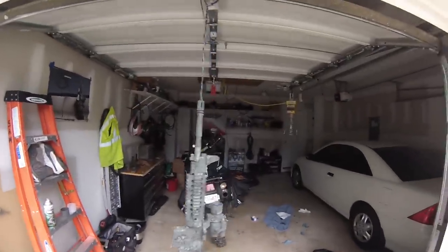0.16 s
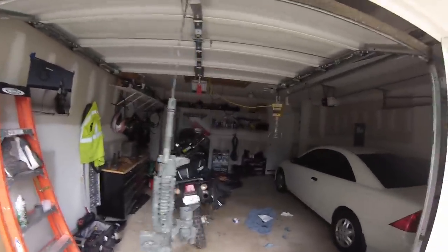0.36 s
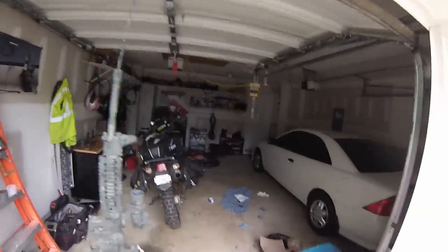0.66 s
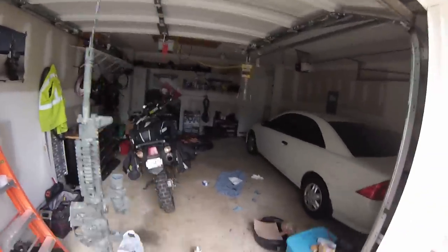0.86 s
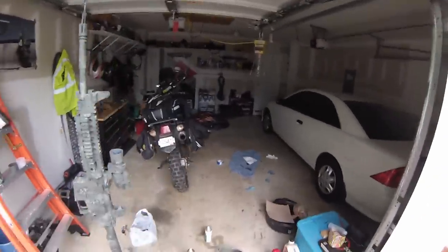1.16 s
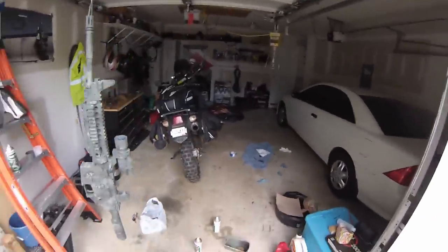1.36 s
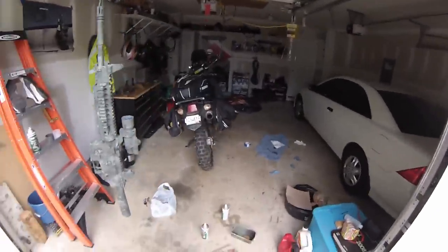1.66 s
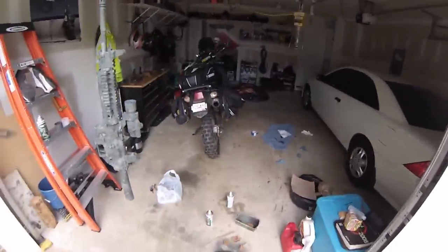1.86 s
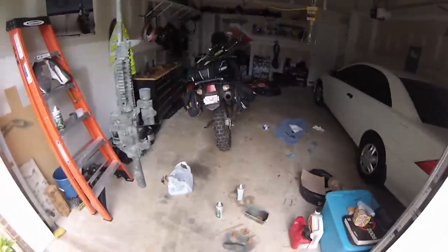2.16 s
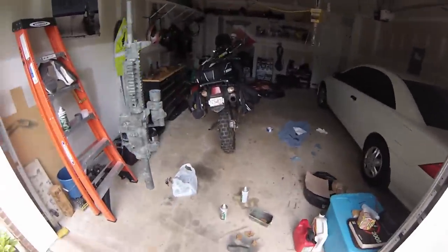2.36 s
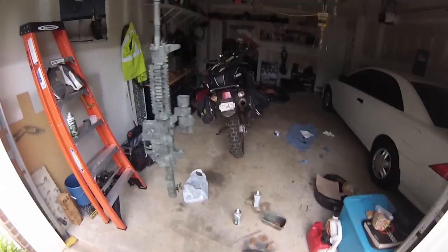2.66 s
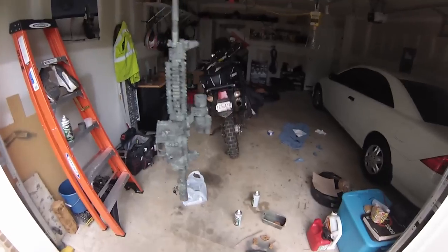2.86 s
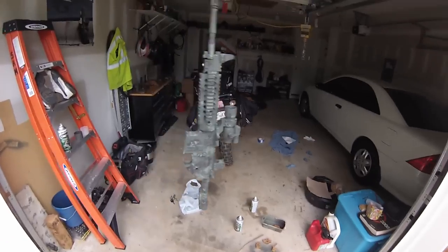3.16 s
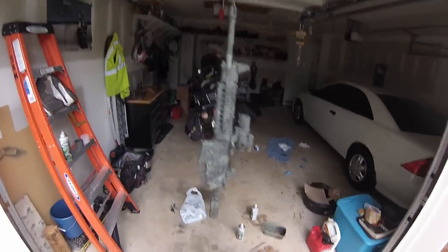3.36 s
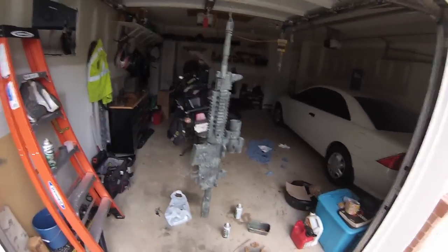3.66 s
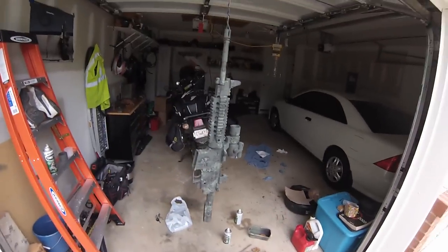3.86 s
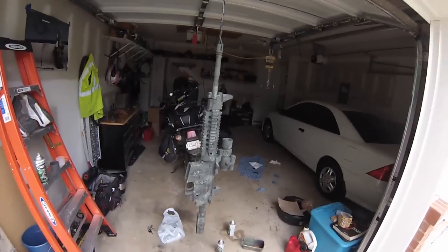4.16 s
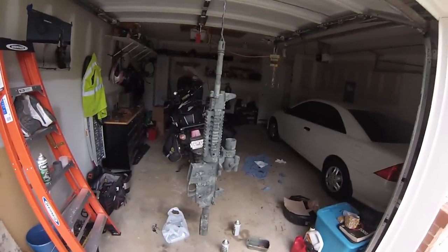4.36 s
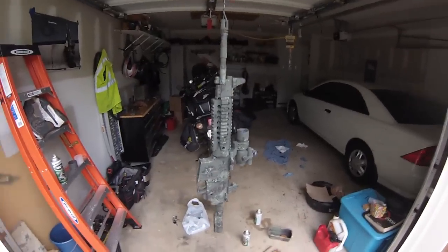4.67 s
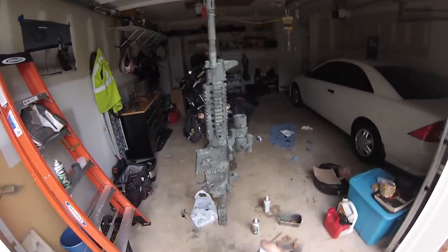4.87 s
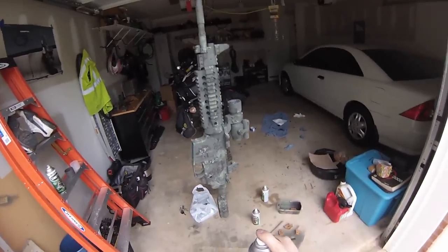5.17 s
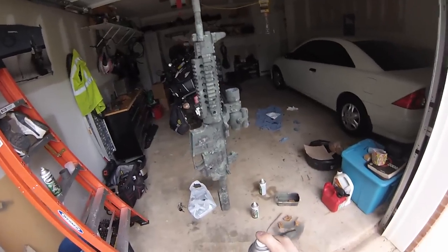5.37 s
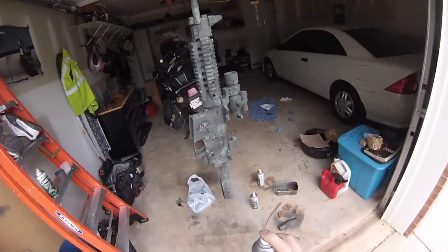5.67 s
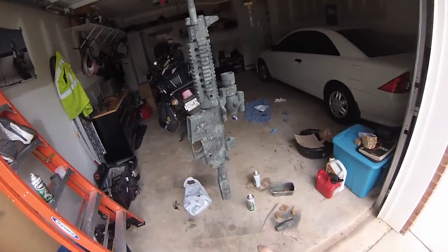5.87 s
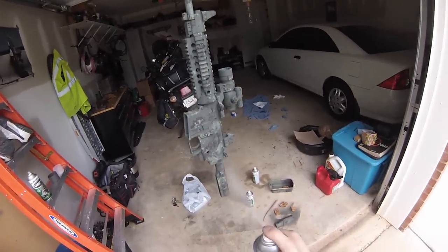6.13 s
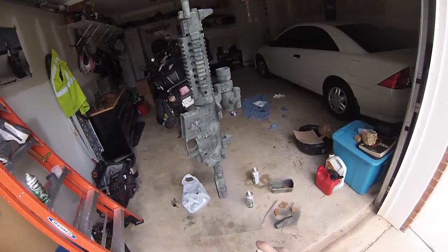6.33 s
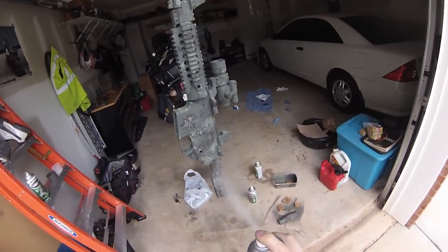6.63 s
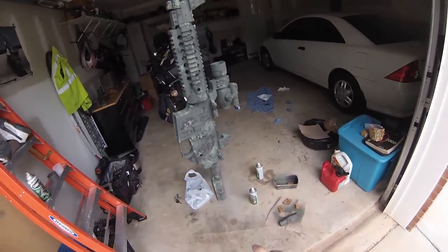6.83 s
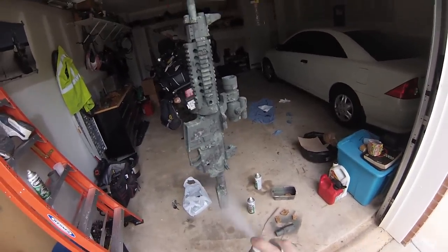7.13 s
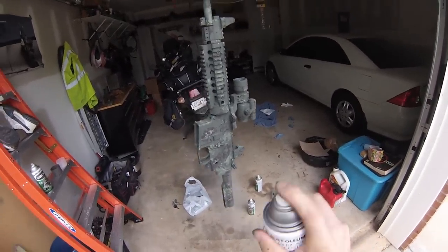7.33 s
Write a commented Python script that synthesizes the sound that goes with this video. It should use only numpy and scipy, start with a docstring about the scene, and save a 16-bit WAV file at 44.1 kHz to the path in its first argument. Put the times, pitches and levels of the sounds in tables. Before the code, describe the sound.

Sharp metallic clacks of a ball inside a shaken aerosol can settle into quick ticks, then brief paint sprays hiss over distant road noise.

```python
"""Sharp cracks come first: a paint can is shaken in a garage doorway and its mixing ball hits the steel wall.
Each crack is a burst of noise through broad resonances, and the shell rings on as decaying bands of noise.
The ball then taps lightly and settles in ever quicker ticks. Five short spurts of shaped noise hiss out.
The garage answers with random echoes; outside, noise and hums make distant traffic that fades away."""
import sys
import numpy as np
from scipy import signal
from scipy.fft import rfft, irfft
from scipy.io import wavfile
from scipy.ndimage import uniform_filter1d

SR = 44100
rng = np.random.default_rng(int(sys.argv[2]) if len(sys.argv) > 2 else 0)


def inscribe(sig):
    """Save sig as 16-bit PCM at rate SR to the path in sys.argv[1].

    A 1-D sig is mono; a 2-D sig holds one channel per row.
    Samples are clipped to [-1, 1] before scaling.
    """
    pcm = np.round(np.clip(np.atleast_2d(sig).T, -1, 1) * 32767)
    wavfile.write(sys.argv[1], SR, pcm.astype(np.int16))


N = 330750  # samples, 7.5 s


def undb(db):
    """Decibels to gain."""
    return 10 ** (np.asarray(db) / 20)


def unit(x):
    """Scale to rms 1."""
    return x / np.sqrt(np.mean(x ** 2))


def add(out, start_s, x):
    """Mix x into out from start_s on."""
    i = int(start_s * SR)
    out[i:i + len(x)] += x[:max(len(out) - i, 0)]


def fade(t, t60):
    """Exponential decay that loses 60 dB in t60 seconds."""
    return np.exp(-np.log(1000) * t / t60)


def resonate(x, hz, width_hz):
    """Two-pole resonance with gain 1 at its centre."""
    hz = min(hz, SR * .45)  # stay below the highest pitch the sample rate can hold
    return signal.lfilter(*signal.iirpeak(hz, hz / width_hz, fs=SR), x)


def resonate_twice(x, hz, width_hz):
    """The same resonance two times over, for steeper sides."""
    return resonate(resonate(x, hz, width_hz), hz, width_hz)


def colour(x, points):
    """Shape x by a spectrum of (pitch_hz, level_db) points, joined on a logarithmic pitch scale."""
    hz, db = np.transpose(points)
    f = np.maximum(np.fft.rfftfreq(len(x), 1 / SR), 1)
    gain = undb(np.interp(np.log(f), np.log(hz), db))
    return irfft(rfft(x) * gain, len(x))


def walk(rate):
    """Smooth random wander with a spread near 1, built from rate random steps per second."""
    k = int(SR / rate)
    steps = np.repeat(rng.standard_normal(N // k + 1), k)
    return np.sqrt(2) * uniform_filter1d(uniform_filter1d(steps, k), k)[:N]


def curve(rows):
    """One value per sample for each column after the times in a table."""
    s, *columns = np.transpose(rows)
    return [np.interp(np.arange(N) / SR, s, c) for c in columns]


def tone(hz, db, waver=0.0056, throb_db=2.0):
    """A hum that wavers in pitch (by a share of hz) and in level."""
    phase = 2 * np.pi * np.cumsum(hz * (1 + waver * walk(6))) / SR
    return np.sqrt(2) * undb(db + throb_db * walk(5)) * np.sin(phase)


# Hard blows of the ball on the wall; clink and ring are relative to the level:
# start_s [s], level_db [dB], clink_db [dB], ring_db [dB]
BLOWS = [(0.0911, -21, -8.5, -7.5), (0.3156, -32, 2.5, 1), (0.3442, -23, -13, -5), (0.4202, -28, -10.5, -6),
         (0.5666, -31.5, -1, -1.5), (0.5786, -22, 3, -8.5), (0.752, -27.5, -29, -6.5),
         (0.805, -29.5, -21, -4.5), (0.8915, -36, -9, -6.5), (0.9913, -18, -18, -8), (1.0205, -27, -22, -8),
         (1.0965, -32, -26, -1), (1.4752, -22, -13, -4.5), (1.5039, -26.5, -28, 0.5),
         (1.6825, -23.5, -5.5, -4.5), (1.7629, -23.5, -29, -4), (1.861, -29, -13, 0.5),
         (1.926, -29.5, 0, 1), (1.9451, -18.5, -18, -7.5), (1.968, -32.5, -29, 5), (2.134, -19.5, -3, -12),
         (2.1969, -35, -5, -10), (2.277, -25, -1.5, -10.5), (2.2989, -29.5, -3, -6),
         (2.3219, -21.5, -20, -21), (2.5042, -34.5, -16, -21), (2.6975, -25, -5, -7.5),
         (2.7153, -23.5, -12, -7), (2.8602, -41, 2, -0.5), (3.282, -35, 2.5, -13),
         (3.3925, -34.5, -6.5, -7), (3.4861, -22, -10.5, -13), (3.5085, -27, -7.5, -25),
         (3.643, -34, -15, -8), (3.723, -23.5, -6, -14)]
# The ball chatters along the wall: start_s [s], end_s [s], level_db [dB, average]
CHATTERS = [(0.4395, .456, -36), (.668, .746, -33.5), (.82, .826, -37.5), (1.776, 1.78, -33),
            (1.878, 1.894, -32.5), (2.347, 2.352, -38.5)]
# Later blows knock and tick more; both are relative to a medium blow:
# start_s [s], knock_db [dB], tick_db [dB]
KNOCK_AND_TICK = [(0, -20, -31), (1.0, -7, -24), (1.6, -7, -20), (2.3, -4.5, -23.5), (3.5, 0, -16.5)]


def blows(gap_s=.0125, jitter_s=.001, scatter_db=2, medium_db=-27.5):
    """Every hard contact: (start_s, level_db, clink_db, ring_db, knock_db, tick_db)."""
    contacts = list(BLOWS)
    for start, end, db in CHATTERS:
        times = np.arange(start, end, gap_s)
        for s, (late, loud, bright) in zip(times, rng.standard_normal((len(times), 3))):
            clink_db = -4 + scatter_db * bright
            contacts.append((s + jitter_s * late, db + scatter_db * loud, clink_db, -4))
    s, db, clink_db, ring_db = np.transpose(contacts)
    at, medium_knock_db, medium_tick_db = np.transpose(KNOCK_AND_TICK)
    # relative to the blow, knock and tick shrink as it gets harder
    above_medium_db = db - medium_db
    knock_db = np.interp(s, at, medium_knock_db) - 0.28 * above_medium_db
    tick_db = np.interp(s, at, medium_tick_db) - 0.87 * above_medium_db
    tick_db = tick_db + 0.07 * (clink_db - np.mean(clink_db))  # a bright contact also ticks more
    return np.transpose([s, db, clink_db, ring_db, knock_db, tick_db])


def shaking(contacts, rise_per_db=.0045):
    """Each blow cracks in four broad resonances, neighbours in opposite phase; the shell rings on."""
    out = np.zeros(N)
    for s, db, clink_db, ring_db, knock_db, tick_db in contacts:
        pitch = 1 + rise_per_db * (clink_db + 11.5)  # a harder contact favours higher modes
        body = crack(3330 * pitch, 1160)
        knock = undb(knock_db) * crack(2040, 2100)
        clink = undb(clink_db) * crack(5390, 1130)
        tick = undb(tick_db) * crack(10500, 8200)
        add(out, s, undb(db) * (body - knock - clink + tick))
        add(out, s, undb(db + ring_db) * shell_ring(np.sqrt(pitch)))
    return out


def crack(hz, width_hz):
    """One contact: a push and a brief scrape through a broad resonance, rms 1 over its first 3 ms."""
    t = np.arange(SR // 40) / SR
    push = .33 * rng.standard_normal(len(t)) * fade(t, .009)
    push[0] += 2
    y = resonate_twice(push, hz, width_hz)
    return y / np.sqrt(np.mean(y[:SR * 3 // 1000] ** 2))


# Clusters of close ringing pitches in the steel shell, before each blow shifts them a little:
# pitch_hz [Hz], width_hz [Hz, of each of two filter passes], level_db [dB, relative], t60_s [s, 60 dB decay]
SHELL_CLUSTERS = [(974, 390, -6, 0.071), (1840, 430, -10, 0.071), (3204, 580, 4.5, 0.075),
                  (3850, 2270, -13.5, 0.13), (5510, 260, -12, 0.074), (11700, 1300, -36, 0.11)]


def shell_ring(pitch):
    """The wall rings on in clusters of modes that beat together, differently after every blow."""
    t = np.arange(SR // 6) / SR
    y = np.zeros(len(t))
    for hz, width, db, t60 in SHELL_CLUSTERS:
        cluster = resonate_twice(rng.standard_normal(len(t)), hz * pitch, width)
        y += undb(db) * fade(t, t60) * cluster
    y = y * (1 - np.exp(-(t / .0025) ** 2))  # the ring swells in over a few milliseconds
    return y / np.sqrt(np.mean(y[SR // 300:SR // 60] ** 2))


def skitter(contacts, count=6, gap_s=.016, first_db=-18, loss_db=-3.0, scatter_db=3):
    """After a blow the ball skips along the wall in small, uneven rebounds, brighter after a bright blow."""
    out = np.zeros(N)
    for s, db, *_, tick_db in contacts:
        # a fixed 0.28 plus a random part averaging 1, in units of gap_s
        times = s + np.cumsum(gap_s * (0.28 + rng.exponential(size=count)))
        levels = db + first_db + loss_db * np.arange(count) + scatter_db * rng.standard_normal(count)
        for at, level in zip(times, levels):
            skip = crack(2640, 3800) - crack(4760, 1900)
            skip = skip + undb(0.86 * tick_db + 6.5) * crack(7800, 7000)
            add(out, at, undb(level) * skip)
    return out


# Light taps of the rolling ball: start_s [s], level_db [dB], knock_db [dB, relative to the level]
LIGHT_TAPS = [(0.247, -41, -2), (0.282, -41.5, -3), (0.971, -35.5, 0), (1.1917, -39, 4), (1.263, -37, 0.5),
              (1.2982, -47.5, 10.5), (1.3243, -39.5, 1), (1.4722, -34.5, 0), (1.7334, -38, -7),
              (1.8077, -41.5, 5.5), (1.8446, -37.5, 6.5), (2.5156, -38, -4), (2.9064, -46.5, 11),
              (2.9329, -46, 10.5), (2.9833, -44, 2.5), (2.9972, -44, 6.5), (3.2346, -49.5, 6.5),
              (3.3224, -42.5, 6), (3.3749, -43, 9), (3.4741, -42, 1), (3.586, -39, 3), (3.6397, -44.5, 9.5),
              (3.781, -50, 9), (3.897, -27.5, -5.5), (3.9606, -46, 1), (3.9998, -51, 1),
              (4.0508, -36.5, -4.5), (4.1694, -39, -6.5)]


def rolling(upper_body_db=-10, low_knock_db=-1, sparkle_db=-15):
    """Light taps, damped by the paint, die at once."""
    out = np.zeros(N)
    # a tap that knocks more also clinks more
    taps = [(s, db, knock_db, -9 + 0.7 * knock_db) for s, db, knock_db in LIGHT_TAPS]
    for s, db, knock_db, clink_db in taps + settling():
        body = crack(2950, 1520) - undb(upper_body_db) * crack(3890, 760)
        knock = crack(1816, 510) - undb(low_knock_db) * crack(1014, 500)
        clink = crack(6800, 1500) - undb(sparkle_db) * crack(10700, 5300)
        add(out, s, undb(db) * (body - undb(knock_db) * knock + undb(clink_db) * clink))
    return out


def settling(count=11, start_s=4.272, first_gap_s=.133, shortest_gap_s=.014, gap_shrink=.68):
    """The ball rocks to rest in ever quicker, weaker ticks: (start_s, level_db, knock_db, clink_db)."""
    k = np.arange(count)
    gaps = shortest_gap_s + (first_gap_s - shortest_gap_s) * gap_shrink ** k
    times = start_s + np.cumsum(gaps) - gaps
    levels = -38 - 1.5 * k
    # a faint tick on the far side, partway into each gap but the first
    far_ticks = list(zip(times + .42 * gaps, levels - 14))[1:]
    ticks = list(zip(times, levels)) + far_ticks
    return [(s, db, -6.5, -8) for s, db in ticks]


# Presses of the nozzle: open_s [s], close_s [s], level_db [dB, at opening], sag_db_per_s [dB per s],
# low_hiss_db [dB, relative], squeak_db [dB], release_db [dB]; button() plays the last two
NOZZLE_PRESSES = [(5.494, 5.531, -48, -20, -2.5, -59, -75), (5.769, 5.887, -37, -1, -4.5, -72, -56),
                  (6.249, 6.412, -36.5, -18, -4, -72, -52), (6.745, 6.912, -35, -30, -8, -60, -51),
                  (7.153, 7.351, -38.5, -24, -8, -61, -66)]
# Colour of the jet noise: pitch_hz [Hz], level_db [dB per Hz, relative]
JET_COLOUR = [(500, -13), (900, 0), (1400, -9.5), (2000, -3.5), (3000, -6), (4300, -10), (5400, -1),
              (6200, -8), (7200, -13.5), (9400, -22.5), (10500, -12.5), (11500, -8.5), (13600, -22),
              (15500, -21)]
# Ringing of the nozzle cavity: pitch_hz [Hz], width_hz [Hz], gain_db [dB, on white noise]
NOZZLE_CAVITY = [(2590, 116, 7), (3400, 276, 0.5)]


def spraying(open_s, close_s, flutter_db=1.5):
    """The valve opens quickly, pressure sags while it is held, and the jet rings the nozzle cavity."""
    t = np.arange(N) / SR
    turbulence = rng.standard_normal(N)
    cavity = sum(undb(db) * resonate(turbulence, hz, width) for hz, width, db in NOZZLE_CAVITY)
    jet = unit(colour(rng.standard_normal(N), JET_COLOUR) + cavity) * undb(flutter_db * walk(70))
    low = signal.sosfiltfilt(signal.butter(2, 6500, fs=SR, output="sos"), jet)
    out = np.zeros(N)
    for start, stop, db, sag_db, low_db, *_ in NOZZLE_PRESSES:
        opening = np.clip((t - start) / open_s, 0, 1)
        closing = np.exp(-np.maximum(t - stop, 0) / close_s)
        pressure = undb(db + sag_db * np.clip(t - start, 0, stop - start))
        # the aim of the jet changes how much of its lower hiss comes back
        out += opening * closing * pressure * (jet + (undb(low_db) - 1) * low)
    return out


def button(length_s=0.0057, width_hz=420):
    """Plastic rubs briefly on the valve stem: at the press, as the valve opens and at the release."""
    t = np.arange(-SR // 50, SR // 50) / SR
    out = np.zeros(N)
    # the first press is too light to chirp
    rubs = [(start + 0.0047, 2670, -53) for start, *_ in NOZZLE_PRESSES[1:]]
    for start, stop, *_, squeak_db, release_db in NOZZLE_PRESSES:
        rubs.append((start - .035, 2850, squeak_db))
        rubs.append((stop + .033, 1760, release_db))
    for s, hz, db in rubs:
        rub = unit(resonate_twice(rng.standard_normal(len(t)), hz, width_hz))
        add(out, s + t[0], undb(db) * np.exp(-(t / length_s) ** 2) * rub)
    return out


def garage(x, early_db, late_db, drying_db_per_s=0, early_t60=0.037, late_t60=0.58, treble_t60=0.47):
    """Quick reflections from floor and clutter, then a tail whose treble dies first."""
    t = np.arange(SR * 3 // 4) / SR
    early = rng.standard_normal(len(t)) ** 3 * fade(t, early_t60) * (t > .003)  # cubing makes it sparse
    diffuse = rng.standard_normal(len(t))
    low = signal.sosfilt(signal.butter(2, 6000, fs=SR, output="sos"), diffuse)
    high_pass = signal.butter(2, 7000, "high", fs=SR, output="sos")
    high = signal.sosfilt(high_pass, rng.standard_normal(len(t)))
    late = (low * fade(t, late_t60) + high * fade(t, treble_t60)) * np.clip(t / 0.0095, 0, 1)
    response = undb(early_db) * early / np.linalg.norm(early) + undb(late_db) * late / np.linalg.norm(late)
    send = undb(-drying_db_per_s * np.arange(N) / SR)  # a can that comes closer sounds drier
    return x + signal.fftconvolve(x * send, response)[:N]


# Tyre tread singing as a car goes by: start_s [s], pitch_hz [Hz], level_db [dB]
TREAD_WHINE = [(0, 926, -65), (.6, 870, -45), (1.0, 863, -43), (1.5, 782, -54.5), (2.9, 833.6, -49.5),
               (4.2, 862, -88)]
# Low throb of that car: start_s [s], level_db [dB]
CAR_THROB = [(1.2, -74), (1.75, -42.5), (2.3, -57), (2.8, -71)]


def passing_car(tread_rate=170, throb_hz=86, throb_rate=30):
    """Narrow bands of noise: tread whine that sinks in pitch, then climbs again, and a low throb."""
    def murmur(hz, rate):
        """Two slow random wanders turn a pure tone into a narrow band of noise."""
        phase = 2 * np.pi * np.cumsum(hz * np.ones(N)) / SR
        return walk(rate) * np.cos(phase) + walk(rate) * np.sin(phase)
    tread_hz, tread_db = curve(TREAD_WHINE)
    throb_db, = curve(CAR_THROB)
    whine = undb(tread_db) * murmur(tread_hz, tread_rate)
    return whine + undb(throb_db) * murmur(throb_hz, throb_rate)


# Far traffic, before its random wander: start_s [s], tyre_db [dB], drone_db [dB]
FAR_TRAFFIC = [(0, -41, -44), (.6, -41.5, -46), (1.05, -39.5, -46.5), (2.1, -45.5, -46.5),
               (3.6, -46, -45.5), (4.2, -49.5, -51.5), (5.8, -53.5, -54), (7.5, -59.5, -63)]
# Colours of the four noises, each: pitch_hz [Hz], level_db [dB per Hz, relative]
TYRE_COLOUR = [(200, -7), (320, -3), (410, -0.5), (620, -2.5), (780, 0.5), (1020, 0.5), (1400, -12),
               (2200, -16), (5000, -21.5), (12000, -45.5)]  # tyre roar
DRONE_COLOUR = [(60, -13), (90, 0.5), (130, -20), (175, -2.5), (205, 2.5), (225, 1.5), (248, 1.5),
                (290, -10.5), (450, -50.5)]  # exhaust drone
RUMBLE_COLOUR = [(15, -7), (28, 9), (42, 4), (56, 3), (72, -5), (100, -5), (145, -2), (300, -44.5)]  # low rumble
AIR_COLOUR = [(500, 38.5), (2000, -31), (3500, 11), (4400, -65), (5500, 28.5), (7000, 18), (9500, 19),
              (12500, 19), (15500, -10)]  # faint steady hiss
# A far engine nearly holding its speed, before it wavers: start_s [s], pitch_hz [Hz], level_db [dB]
FAR_ENGINE = [(.4, 152.7, -87), (1.4, 156.4, -49), (2.1, 156.8, -48.5), (2.7, 155.4, -59),
              (3.5, 155.6, -51.5), (4.9, 156.2, -62)]
# Machine hum, before it wavers: pitch_hz [Hz], level_db [dB]
MACHINE_HUM = [(57, -53), (120, -58), (240, -63.5)]


def outdoors():
    """Tyre noise and exhaust drone of far traffic over rumble, wavering hums and faint air hiss."""
    tyre_db, drone_db = curve(FAR_TRAFFIC)
    colours = (TYRE_COLOUR, DRONE_COLOUR, RUMBLE_COLOUR, AIR_COLOUR)
    tyres, drone, rumble, air = (unit(colour(rng.standard_normal(N), c)) for c in colours)
    traffic = tyres * undb(tyre_db + 0.98 * walk(14)) + drone * undb(drone_db + 1.16 * walk(4.9))
    hums = tone(*curve(FAR_ENGINE)) + sum(tone(hz, db) for hz, db in MACHINE_HUM)
    return traffic + hums + rumble * undb(-49.5 + walk(8)) + air * undb(-65.5)


def scene():
    """The can moves about in the doorway, so each action reaches the room differently."""
    contacts = blows()
    ball = shaking(contacts) + skitter(contacts)
    shake = garage(ball, early_db=-9.5, late_db=-8.0, drying_db_per_s=0.38)
    roll = garage(rolling(), early_db=-8.5, late_db=-11.5)
    nozzle = spraying(open_s=0.026, close_s=0.028) + button()
    spray = garage(nozzle, early_db=-11.5, late_db=-13.5)
    return (shake + roll + spray + outdoors() + passing_car())[None]


def record(dry, top_hz=15300):
    """A steep low-pass filter removes the treble above top_hz."""
    return signal.sosfilt(signal.ellip(8, .2, 70, top_hz, fs=SR, output="sos"), dry)


dry = scene()
out = record(dry)
inscribe(out)
```